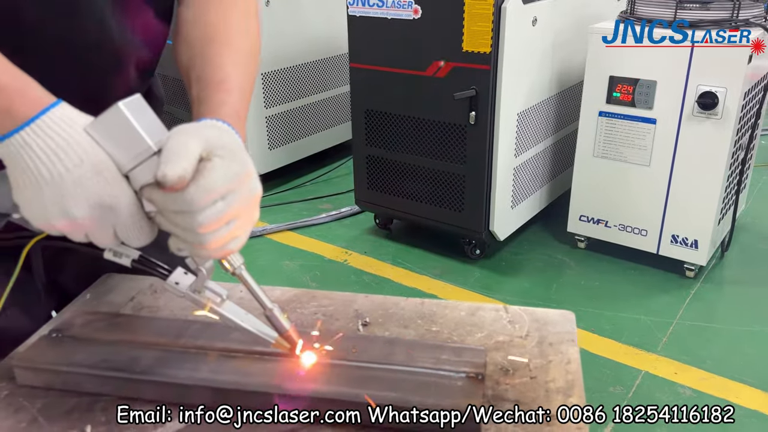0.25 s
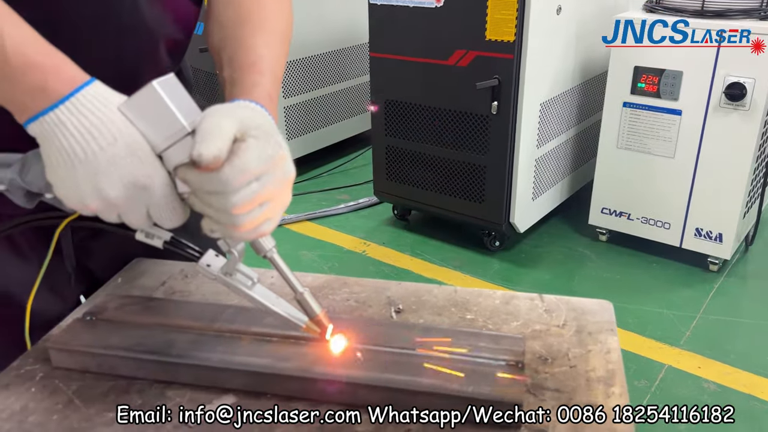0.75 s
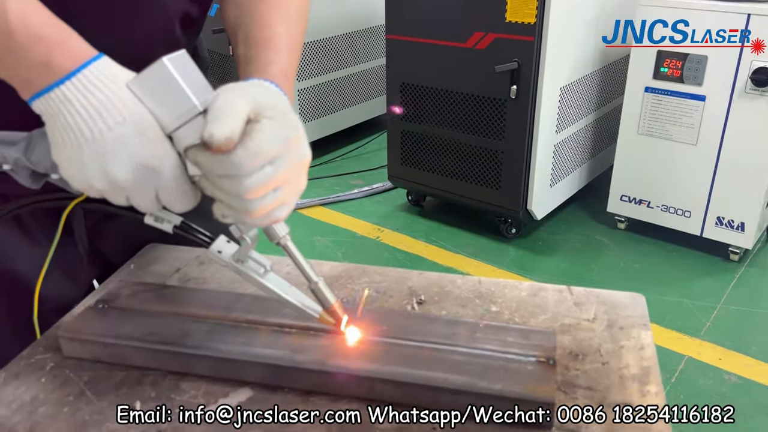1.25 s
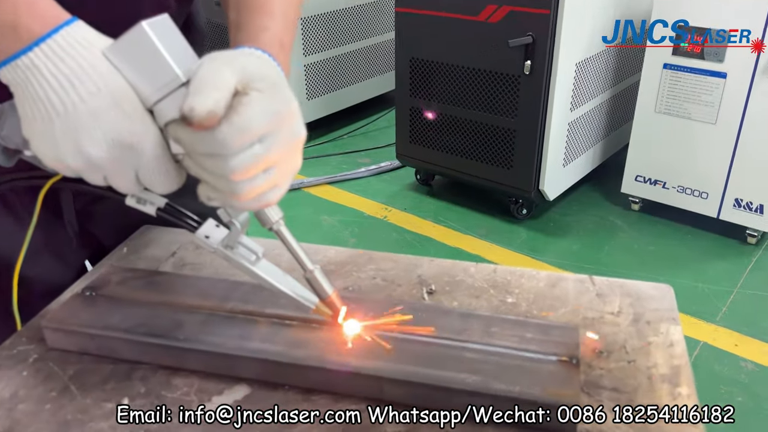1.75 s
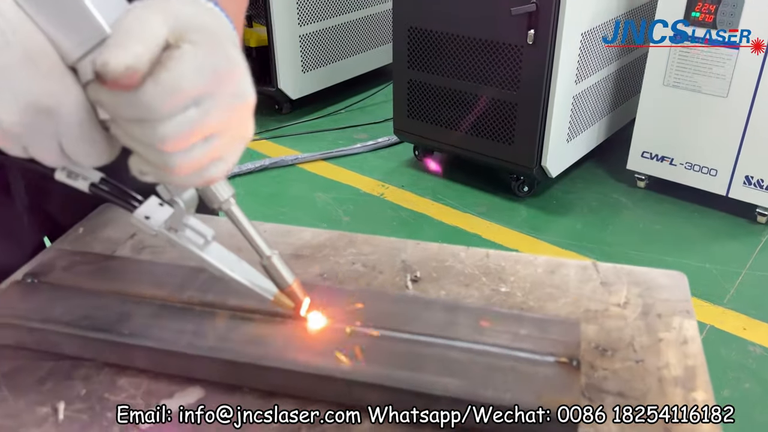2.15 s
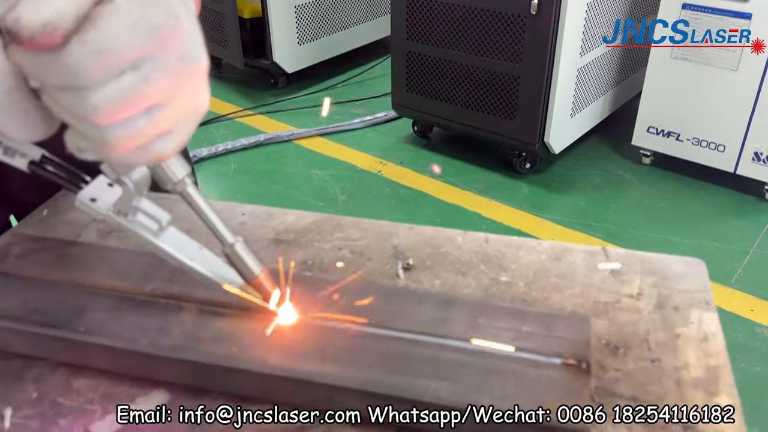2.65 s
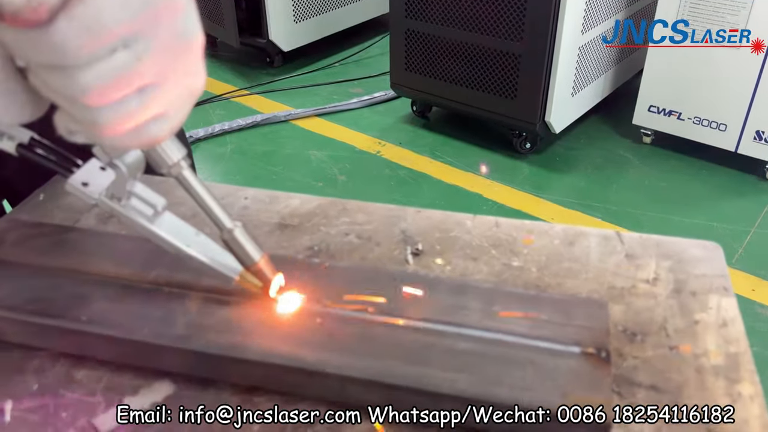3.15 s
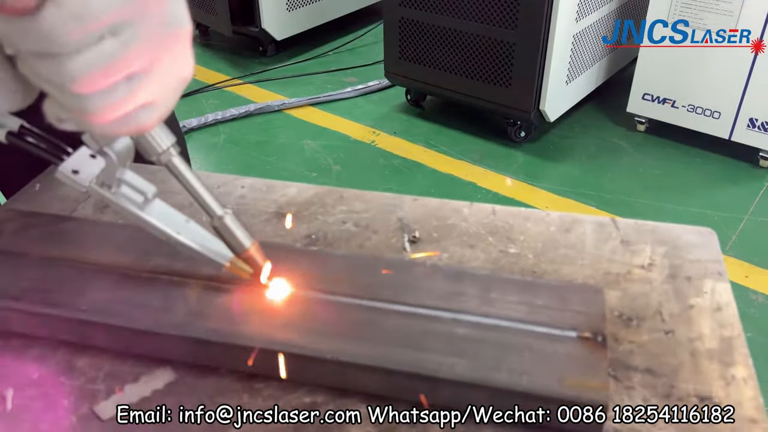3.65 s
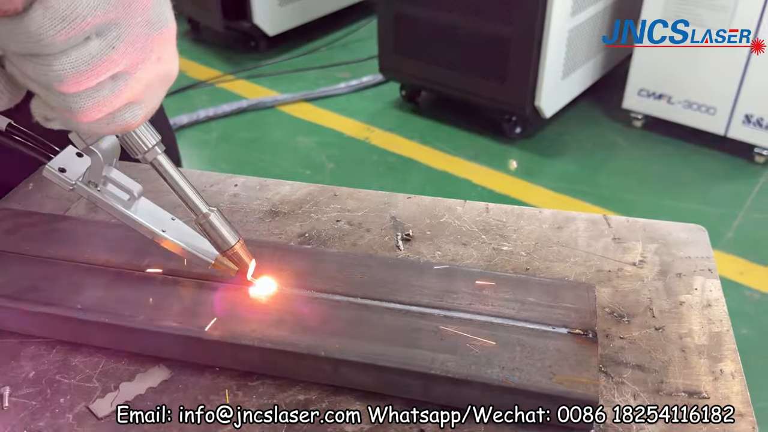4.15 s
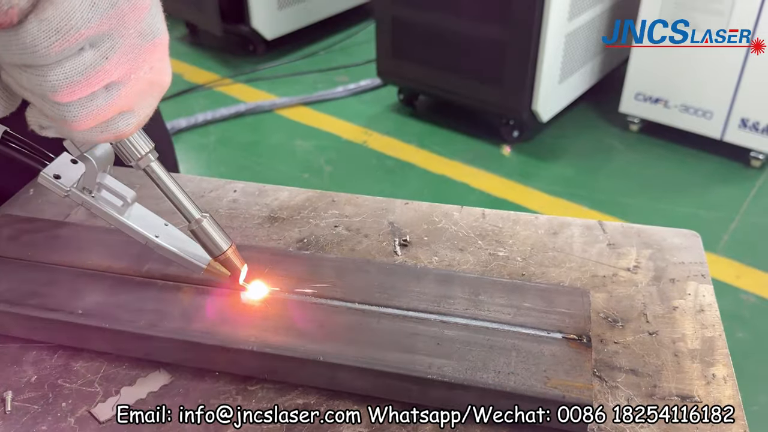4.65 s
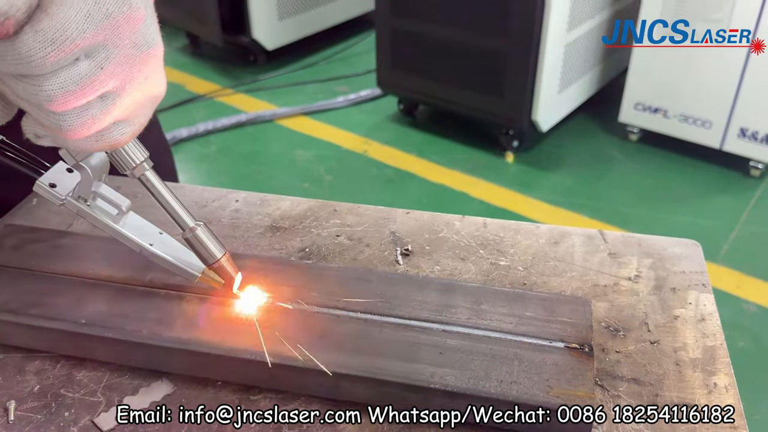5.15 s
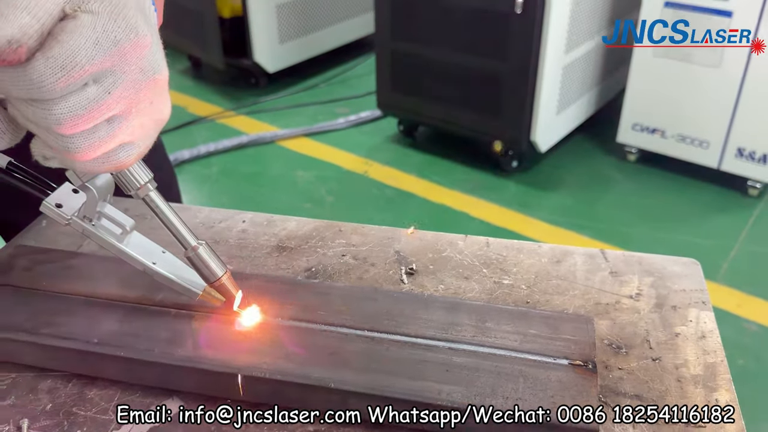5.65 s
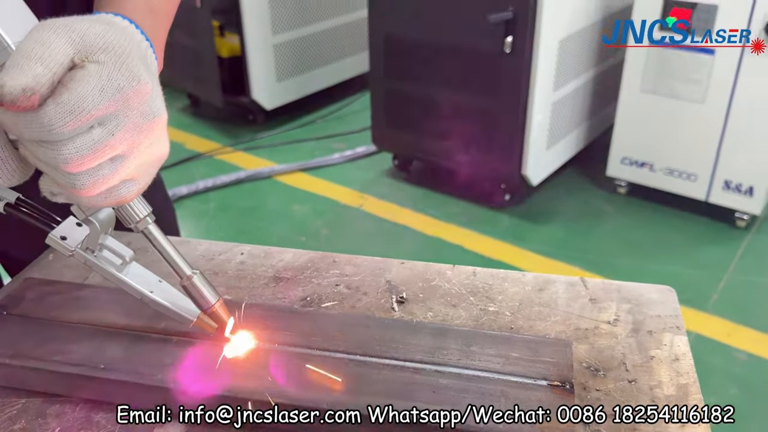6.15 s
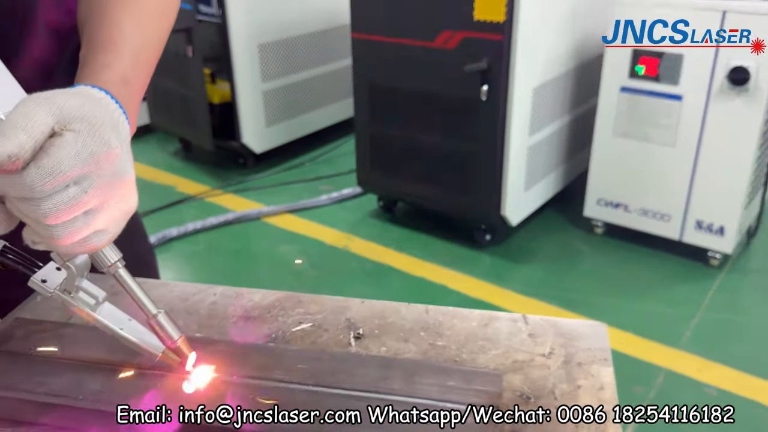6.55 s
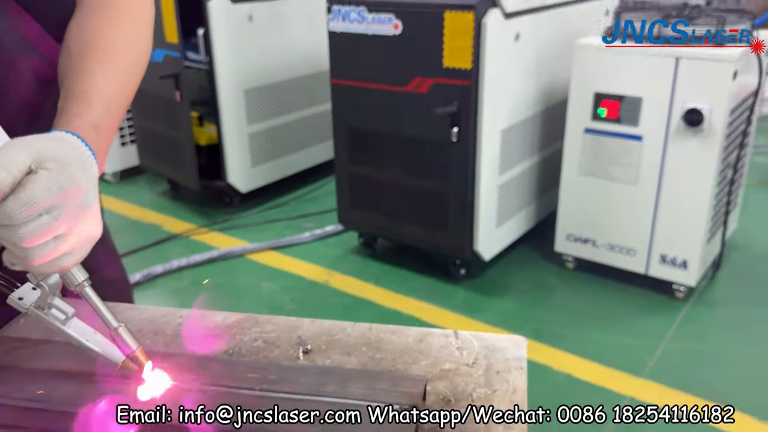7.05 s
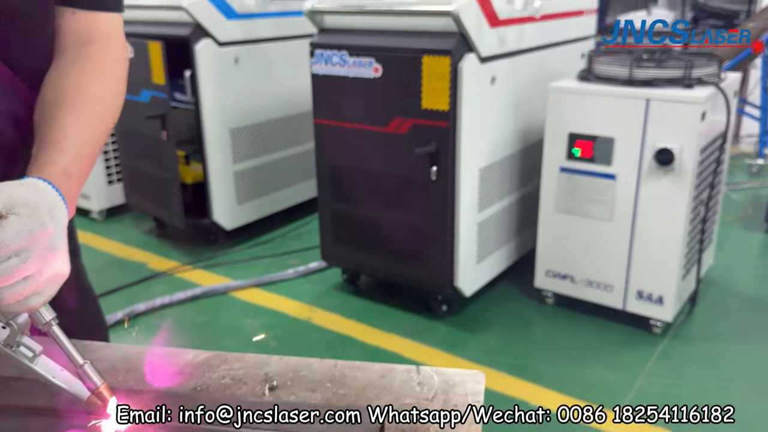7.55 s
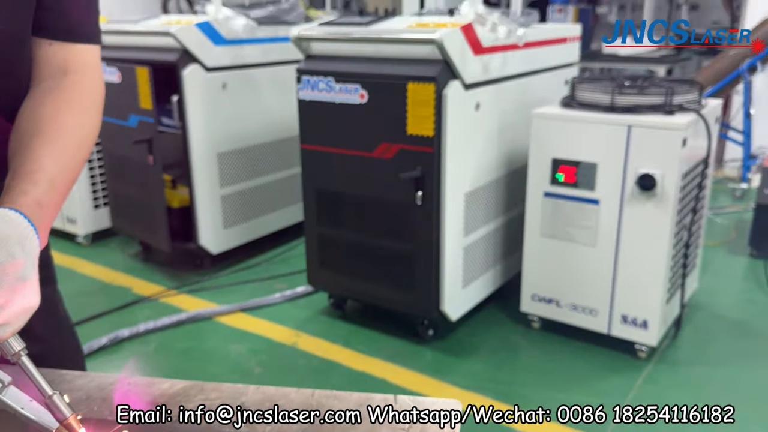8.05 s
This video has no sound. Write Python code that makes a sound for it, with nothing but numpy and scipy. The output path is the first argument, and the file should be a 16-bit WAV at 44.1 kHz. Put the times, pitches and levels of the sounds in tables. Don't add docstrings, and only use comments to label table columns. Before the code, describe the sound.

Steady sizzling of metal under a welding beam, already running at the start and still running at the end, grainy and buzzing with tiny sharp droplet ticks. It swells as the phone moves closer, peaks near four seconds, then recedes. A soft thud and a harder one come early on. Low fan drone and diffuse stereo workshop reflections surround it; the right side shifts in tone.

```python
import sys
import numpy as np
from scipy import signal
from scipy.fft import rfft, irfft
from scipy.io import wavfile
from scipy.ndimage import uniform_filter1d

SR = 44100
rng = np.random.default_rng(int(sys.argv[2]) if len(sys.argv) > 2 else 0)


def put_to_file(sound):
    columns = np.atleast_2d(sound).T
    safe = np.clip(columns, -1, 1)
    whole_steps = np.round(safe * 32767)
    wavfile.write(sys.argv[1], SR, whole_steps.astype(np.int16))


def elevation(decibels):
    levels = np.asarray(decibels, float)
    return 10 ** (levels / 20)


N = 366471
FRAME = 256
FREQ = np.fft.rfftfreq(FRAME, 1 / SR)[:, None] + 1

HANDOVER_S, HANDOVER_TAKES_S = 2.21, 0.53
FREED_S, FREED_TAKES_S = 7.66, 0.044


def noise():
    return rng.standard_normal(N)


def colour(table, hz):
    table_hz, value = np.transpose(table)
    return np.interp(np.log(hz), np.log(table_hz), value)


def curve(table, t):
    return np.interp(t, *np.transpose(table))


def ramp(t, start_s, takes_s):
    return np.clip((t - start_s) / takes_s, 0, 1)


def shape(x, gain):
    frames = signal.stft(x, SR, nperseg=FRAME)[2]
    t = np.arange(frames.shape[1]) * FRAME / 2 / SR
    return signal.istft(frames * gain(t), SR)[1][:N]


def walk(rate):
    hold = int(SR / rate)
    steps = np.repeat(rng.standard_normal(N // hold + 1), hold)
    smooth = uniform_filter1d(uniform_filter1d(steps, hold), hold)[:N]
    return smooth / smooth.std()


def flicker(rate):
    w = walk(rate)
    return w - uniform_filter1d(w, int(5 * SR / rate))


# (frequency [Hz], level per Hz [dB])
FAN_TONE = [(15, -56), (25, -29), (128, -5), (156, -6.5), (192, 0.5), (301, -10), (345, -7), (502, -10),
            (637, -9), (763, -17), (900, -22), (1170, -21.5), (1980, -120)]
# (time [s], level [dB])
FAN_LEVEL = [(0, -34.5), (2.6, -32.5), (5, -34), (8.31, -36)]
# (frequency [Hz], side minus mid [dB])
FAN_WIDTH = [(25, -4), (60, -9), (180, -16), (400, -11), (900, -8)]
# (frequency [Hz], width [Hz], boost [dB])
PANELS = [(202, 53, 2), (350, 17, 1.5), (653, 30, 1.5)]


def fans():
    hz = np.fft.rfftfreq(N, 1 / SR) + 1
    tone_db = colour(FAN_TONE, hz)
    for panel_hz, width_hz, boost_db in PANELS:
        tone_db = tone_db + boost_db / (1 + (2 * (hz - panel_hz) / width_hz) ** 2)
    mid = irfft(rfft(noise()) * elevation(tone_db), N)
    side = irfft(rfft(noise()) * elevation(tone_db + colour(FAN_WIDTH, hz)), N)
    level_db = curve(FAN_LEVEL, np.arange(N) / SR) + 0.97 * walk(8)
    return np.array([mid + side, mid - side]) / mid.std() * elevation(level_db)


# (time [s], peak level [dB])
THUDS = [
    (2.509, -24),
    (2.655, -18),
]


def thuds():
    t = np.arange(N) / SR
    out = np.zeros(N)
    for start_s, level_db in THUDS:
        age = np.clip(t - start_s, 0, 1) / 0.0074
        push = age * np.exp(1 - age)
        out += elevation(level_db) * push * np.sin(2 * np.pi * 205 * 0.00785 * age)
    return out


# (frequency [Hz], level against the direct weld [dB])
HALL_TONE = [(700, -3), (1500, -7.5), (2450, -3), (2750, -12), (3050, -8.5), (3400, -6.5), (5000, -8.5),
             (6000, -9.5), (7400, -13.5), (8000, -12.5), (8900, -22.5), (9600, -21.5), (15500, -1)]


def hall():
    def gain(t):
        near_db = nearness_db(t) - USUAL_DB
        screened = 1 - ramp(t, 0.43, 0.15)
        low_db = 0.93 - 0.5 * near_db - 2 * screened
        high_db = 4.5 - 2.5 * near_db - 8 * screened
        share_db = np.where(FREQ < 7000, low_db, high_db * (FREQ < 10000))
        return weld_gain(t) * elevation(colour(HALL_TONE, FREQ) + share_db)
    return np.array([shape(noise(), gain) for _ in range(2)])


# (frequency [Hz], level [dB])
RIGHT_COLOUR = [(100, 0), (1200, -3), (2200, -2), (2900, 0), (3900, -2), (4800, 4.5), (5500, 1), (6400, -2),
                (7300, -1.5), (8100, 0)]


def right_colour():
    return elevation(colour(RIGHT_COLOUR, FREQ))


def cabinet_share(t):
    centre_hz, width_hz, most = 2380, 2200, 0.7
    band = 1 / (1 + (2 * (FREQ - centre_hz) / width_hz) ** 4)
    return most * band * (1 - ramp(t, HANDOVER_S, HANDOVER_TAKES_S))


def cabinet_echo(left):
    late = np.roll(left, int(31 * SR / 1000))
    return shape(late, lambda t: right_colour() * np.sqrt(cabinet_share(t)))


def steering(t):
    shade_from_s = 5.8
    freed = ramp(t, FREED_S, FREED_TAKES_S)
    shade = ramp(t, shade_from_s, FREED_S - shade_from_s) ** 7 * (1 - freed)
    before, after = 0.18, 0.95
    share = before + (after - before) * ramp(t, HANDOVER_S, HANDOVER_TAKES_S) - 0.16 * shade
    level_db = -11 * shade + 3 * freed
    low_hz, usual_hz, free_hz = 1340, 6280, 6700
    edge_hz = low_hz + (usual_hz - low_hz) * ramp(t, HANDOVER_S, 0.081)
    edge_hz = edge_hz + (free_hz - usual_hz) * ramp(t, FREED_S + FREED_TAKES_S, 0.1)
    return share, level_db, edge_hz


# (frequency [Hz], lag [rad])
FRONT_PORT = [(100, -1.5), (2100, 1.66), (3000, 1), (3800, 0.95), (4500, 1.15), (5500, 4.5), (6000, 5),
              (6400, 7.5), (7200, 8), (8000, 9.5), (8900, 9), (9800, 8.5), (16000, 7)]


def front_lag(t):
    faces_seam_s = 1.44
    sway = 0.67 * (np.clip(np.abs(t - faces_seam_s), 0, 1.2) ** 2 - 0.4)
    sway = sway * (t < HANDOVER_S + HANDOVER_TAKES_S) * (FREQ > 2000) * (FREQ < 6200)
    return np.interp(FREQ, *np.transpose(FRONT_PORT)) + sway


# (frequency [Hz], lag [rad])
FAR_PORT = [(100, 0.5), (1400, 0.62), (2400, 2.5), (2780, 3), (3300, 4), (4000, 4.5), (4500, 5), (5000, 7),
            (5500, 7.5), (6000, 8.5), (6400, 11.5), (8000, 8)]
# (time [s], extra lag at the far port [rad])
BEARING = [(0, 0.16), (2.1, 1.6), (2.3, -1.4), (2.55, -0.71), (3.1, -0.067), (6.1, 0.069), (7, 0.9),
           (7.6, 1.6), (7.74, 0.081), (8.31, 0.24)]


def far_lag(t):
    turned = curve(BEARING, t) * np.clip(FREQ / 1500, 0, 1)
    behind = 0.49 * np.clip(FREQ - 3200, 0, 3000) / 1000 * ramp(t, FREED_S, 0.4)
    return np.interp(FREQ, *np.transpose(FAR_PORT)) + turned + behind


def right_ports(t):
    share, far_db, edge_hz = steering(t)
    far_gain = share / (1 + (FREQ / (0.96 * edge_hz)) ** 24) * elevation(far_db)
    front_gain = 1 - share / (1 + (FREQ / (1.03 * edge_hz)) ** 14)
    far = far_gain * np.exp(-1j * far_lag(t))
    front = front_gain * np.exp(-1j * front_lag(t))
    return right_colour() * (front + far)


# (delay [ms], gain [1])
PLATE = [(.36, -0.04), (.54, -0.018), (1.5, 0.061), (1.97, 0.22), (2.7, -0.16), (3.6, 0.097), (4.9, 0.21),
         (6.7, -0.12), (9.1, 0.23)]


def plate(x):
    n = np.arange(N)
    drift = 1 + 0.03875 * walk(0.57)
    echoes = sum(gain * np.interp(n - ms * drift * SR / 1000, n, x) for ms, gain in PLATE)
    return x + echoes


# (time [s], level [dB])
NEARNESS = [(0, -26.5), (.5, -27.2), (1.3, -27), (2.1, -24), (2.7, -23), (3.05, -22), (3.6, -24.5),
            (4.3, -21), (4.85, -24), (5.5, -24), (6.6, -25.2), (7.2, -27.5), (8.31, -27)]


def nearness_db(t):
    return curve(NEARNESS, t)


# (frequency [Hz], level per Hz [dB])
VAPOUR_TONE = [(900, -12.5), (1400, -8.5), (2000, -7), (2500, -9.5), (3000, -9), (3500, -2), (5300, -.8),
               (7000, -1), (8800, -.2), (10500, -3.2), (12500, -3.4), (13700, -8.5), (15000, -11.5),
               (15700, -10.5)]
WELD_BANDS_HZ = (1600, 4500, 8000, 11700, 14500)
SWELL = (-0.26, 0.059, -0.18, -0.26, -1)
TURN = (-0.14, 0.064, 0.58, -0.67, -0.32)
USUAL_DB, MIDDLE_S = -24.8, 4.15


def weld_gain(t):
    db = nearness_db(t)
    tilt_db = 0
    for only_this, swell, turn in zip(np.eye(5), SWELL, TURN):
        band = np.interp(np.log(FREQ), np.log(WELD_BANDS_HZ), only_this)
        tilt_db = tilt_db + band * (swell * (db - USUAL_DB) + turn * (t - MIDDLE_S))
    no_rumble = np.clip(FREQ / 500 - 0.4, 0, 1)
    return elevation(colour(VAPOUR_TONE, FREQ) + db + tilt_db + 8.5) * no_rumble


def spatter():
    ticks_per_s = 45
    place, side, luck = rng.random((int(ticks_per_s * N / SR), 3)).T
    ticks = np.zeros(N)
    ticks[(place * N).astype(int)] = np.sign(side - 0.5) * elevation(9.5 - 3.1 * np.log(luck + 0.02))
    return ticks


# (place in the swing [0-1], width [swings], roar [dB], sizzle [dB])
SWING = [(.04, 0.013, 5, -1), (.12, 0.033, -0.5, -7.5), (.36, 0.045, 4.5, 4), (.58, 0.047, -10.5, -6),
         (.66, 0.031, 1.5, 4)]


def vapour():
    swings = np.arange(N) / SR * 34.43
    strength = np.clip(1 + 0.36 * rng.standard_normal((int(swings[-1]) + 2, len(SWING))), 0, 1.6)
    roar_db, sizzle_db = 0, 0
    for k, (place, width, low_db, high_db) in enumerate(SWING):
        since = swings - place + 0.5
        bump = np.exp(-0.5 * ((since % 1 - 0.5) / width) ** 2)
        bump = bump * strength[since.astype(int), k]
        roar_db = roar_db + low_db * bump
        sizzle_db = sizzle_db + high_db * bump
    shared_db = 1.05 * flicker(200)
    registers = [(2700, roar_db), (7000, 1.49 * sizzle_db),
                 (11000, 0.52 * sizzle_db), (40000, 0.73 * sizzle_db)]
    out, below = 0, 0
    for edge_hz, swing_db in registers:
        burn = noise() * elevation(swing_db + shared_db + 1.2 * flicker(170))
        upto = 1 / (1 + (FREQ / edge_hz) ** 8)
        band = np.sqrt(np.abs(upto - below))
        out = out + shape(burn / burn.std(), lambda t: band)
        below = upto
    return out


def scene():
    left = shape(plate(vapour() + spatter()), weld_gain)
    ports = shape(left, lambda t: right_ports(t) * np.sqrt(1 - cabinet_share(t)))
    right = ports + cabinet_echo(left)
    return np.array([left, right]) + hall() + fans() + thuds()


def top_cut(x):
    return signal.sosfilt(signal.butter(12, 16600, fs=SR, output="sos"), x)


def record(dry):
    soft = np.tanh(1.25 * dry) / 1.22
    wide, narrow = (signal.sosfilt(signal.ellip(14, 0.3, 90, top_hz, fs=SR, output="sos"), soft)
                    for top_hz in (15710, 15250))
    opened = ramp(np.arange(N) / SR, 1.55, 0.1)
    mix = narrow + opened * (wide - narrow)
    return top_cut(mix)


dry = scene()
out = record(dry)
put_to_file(out)
```